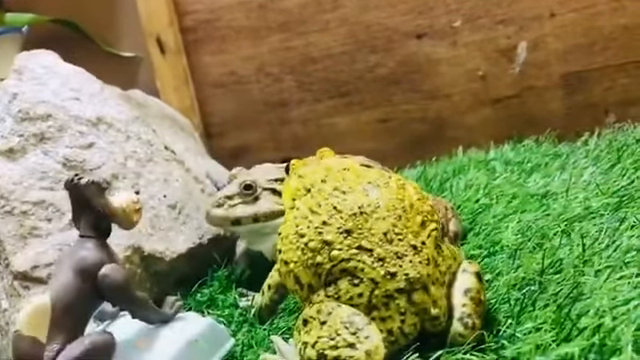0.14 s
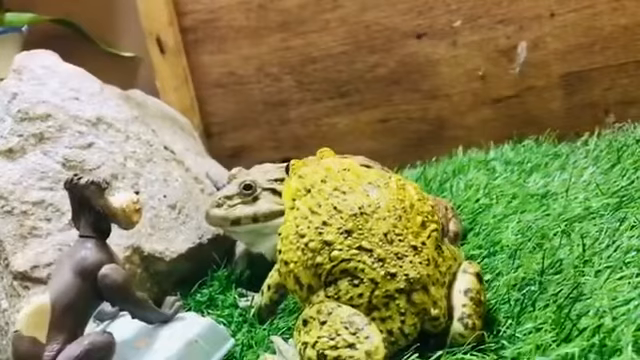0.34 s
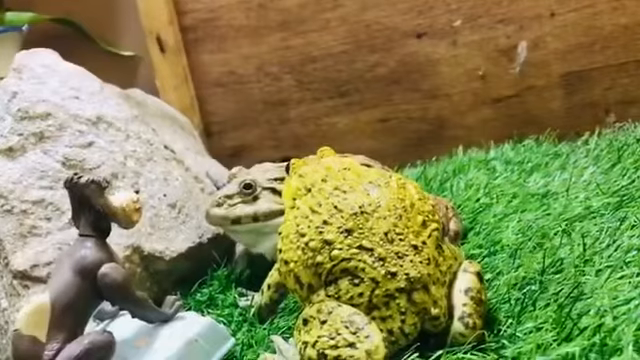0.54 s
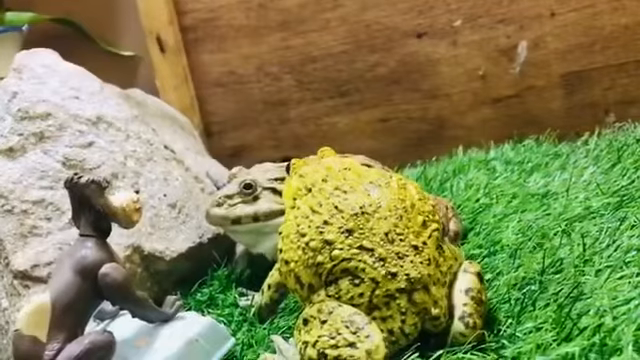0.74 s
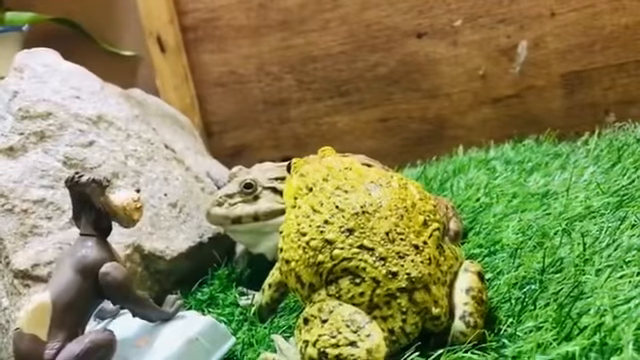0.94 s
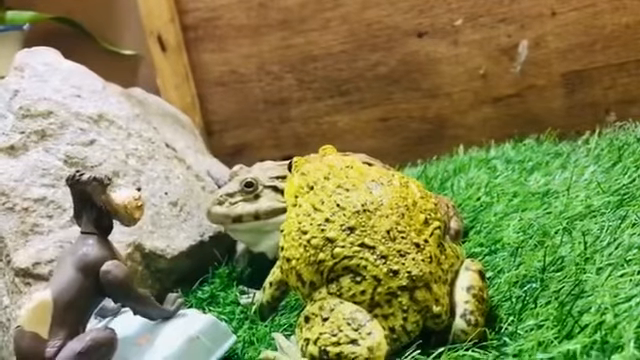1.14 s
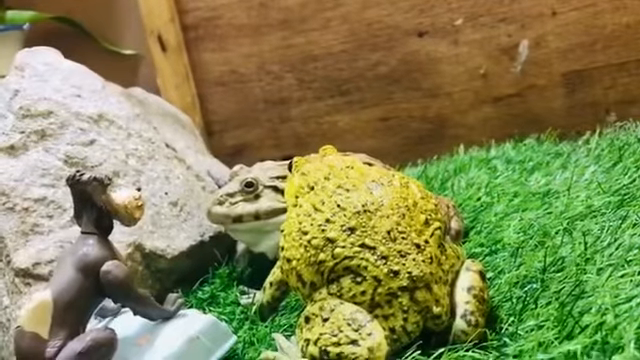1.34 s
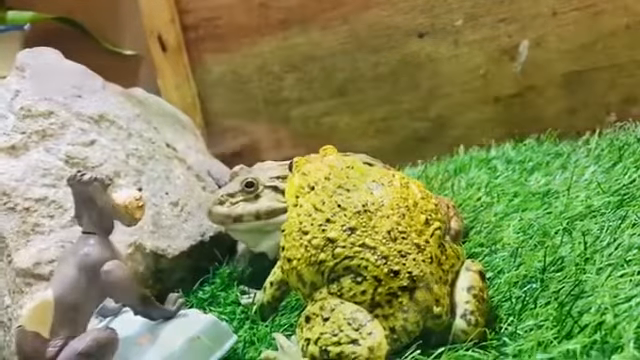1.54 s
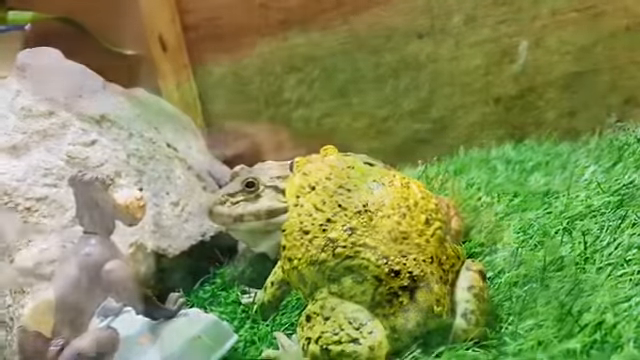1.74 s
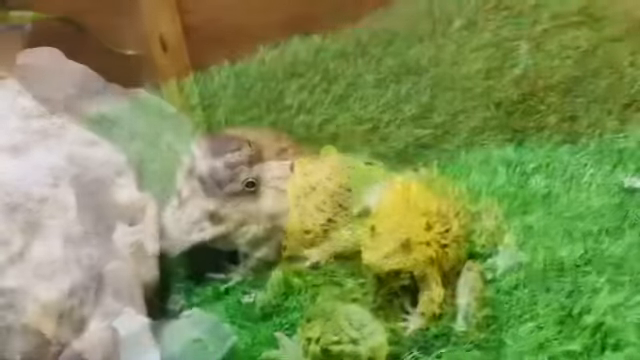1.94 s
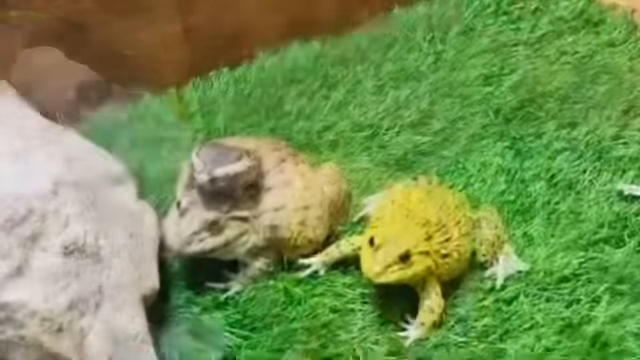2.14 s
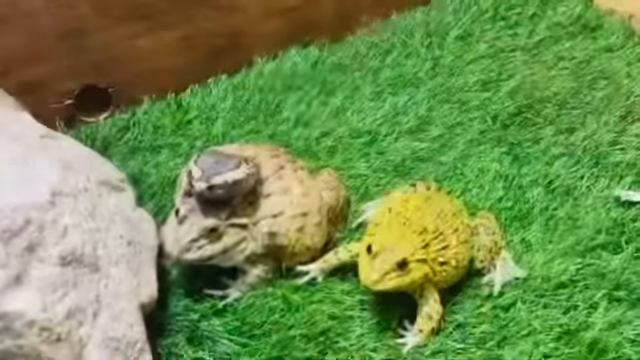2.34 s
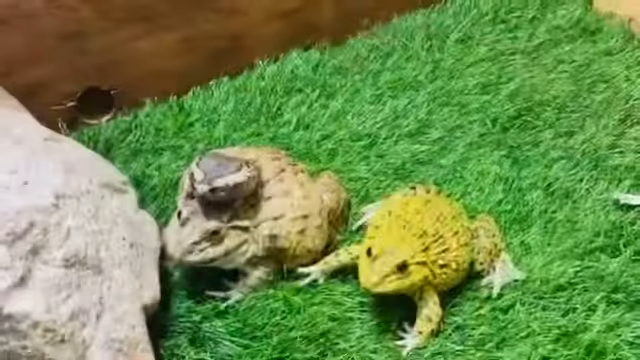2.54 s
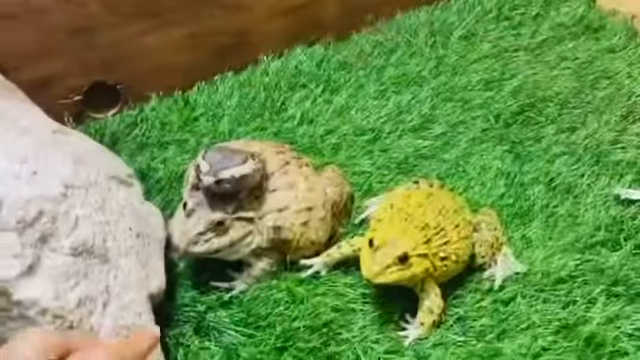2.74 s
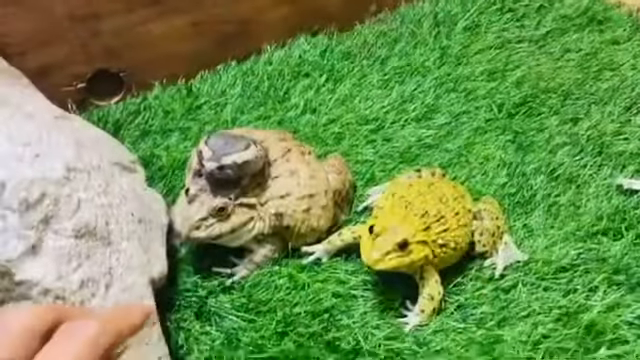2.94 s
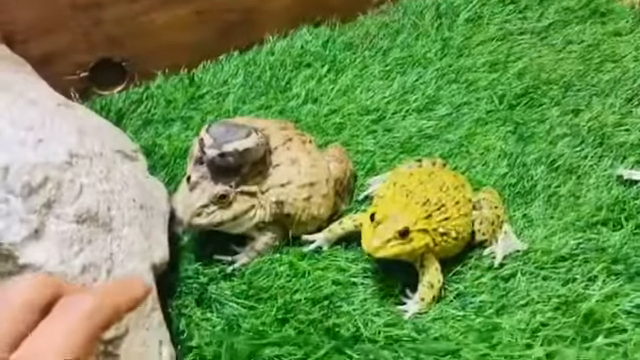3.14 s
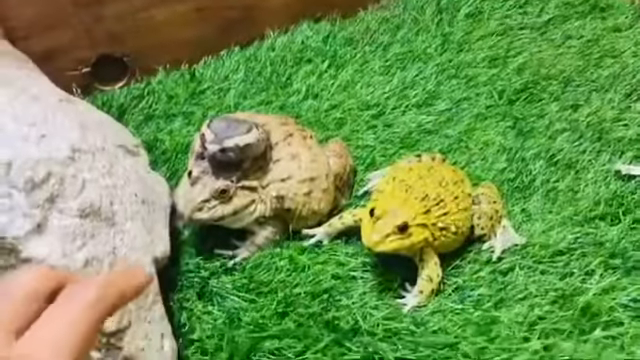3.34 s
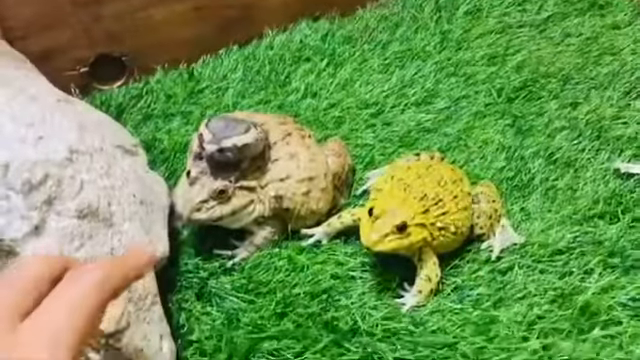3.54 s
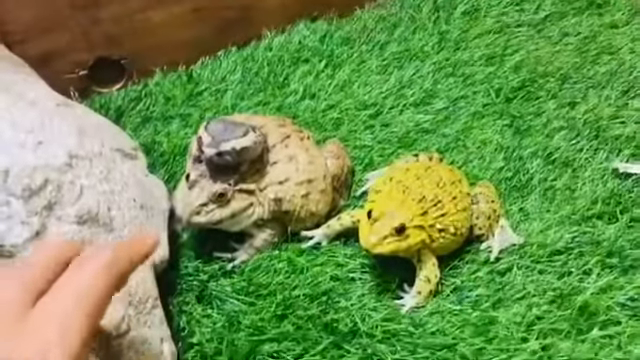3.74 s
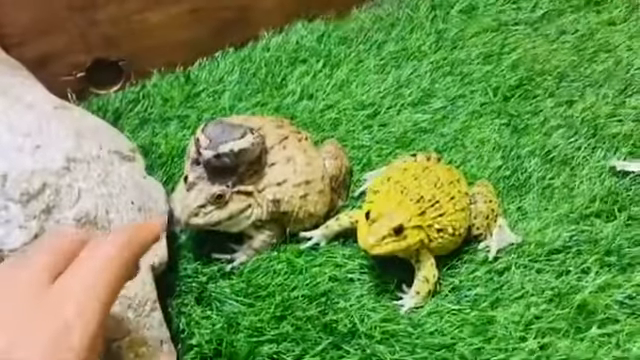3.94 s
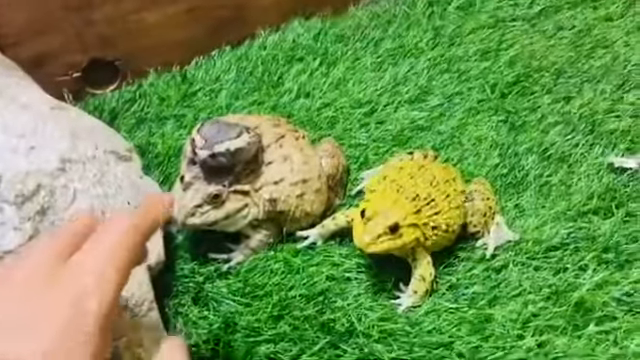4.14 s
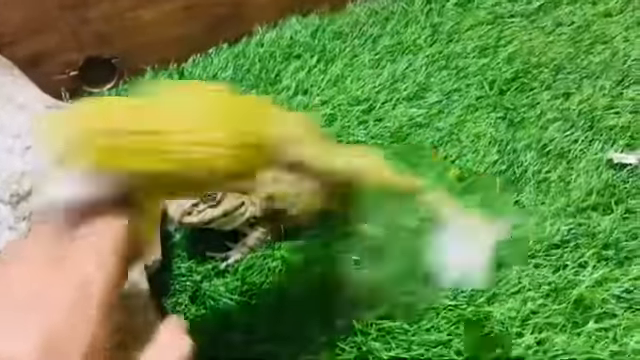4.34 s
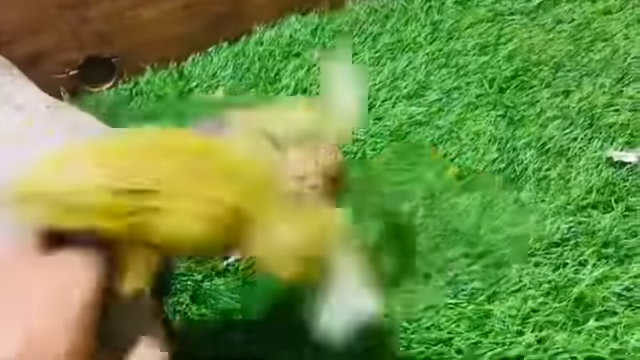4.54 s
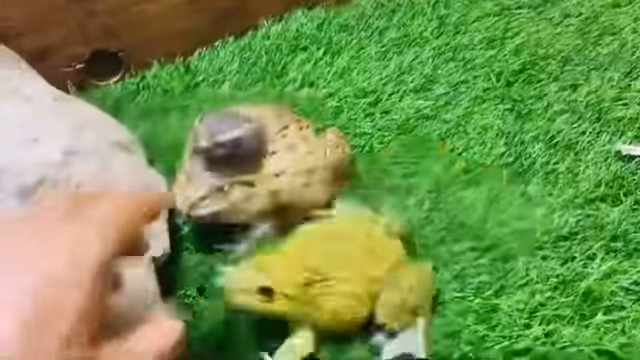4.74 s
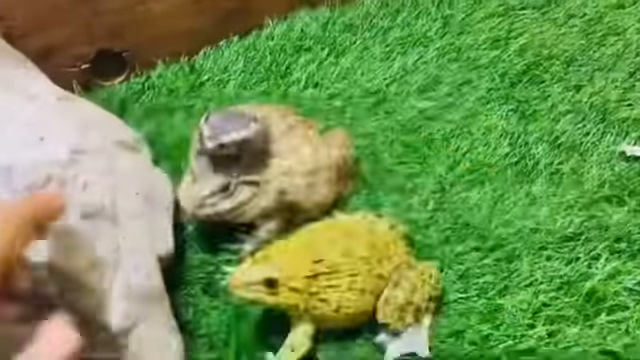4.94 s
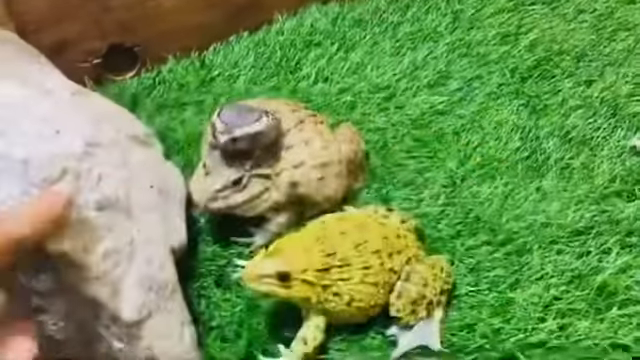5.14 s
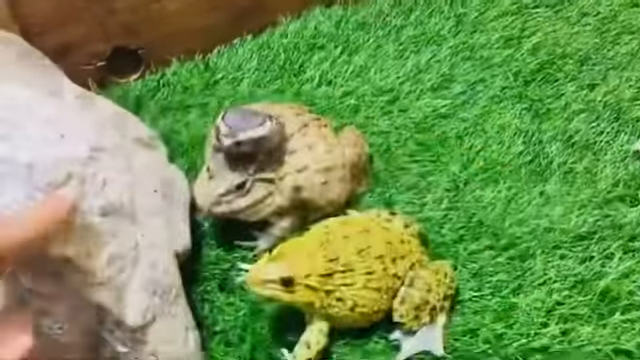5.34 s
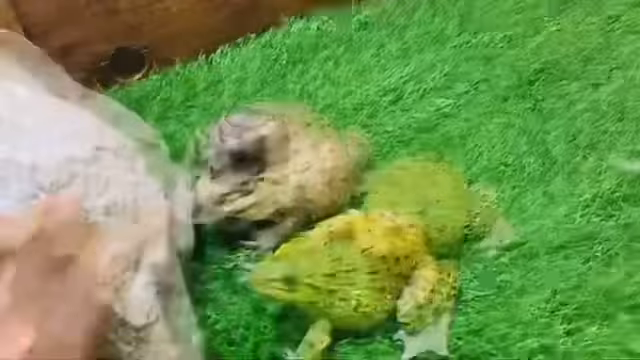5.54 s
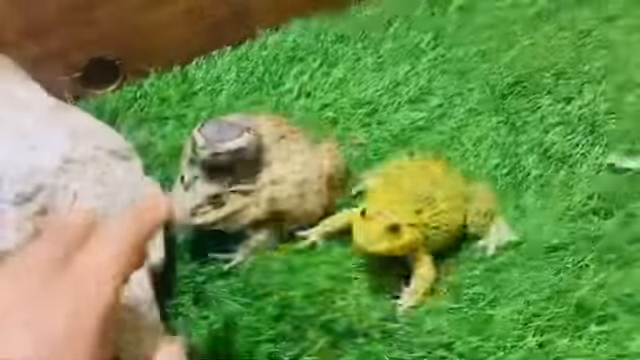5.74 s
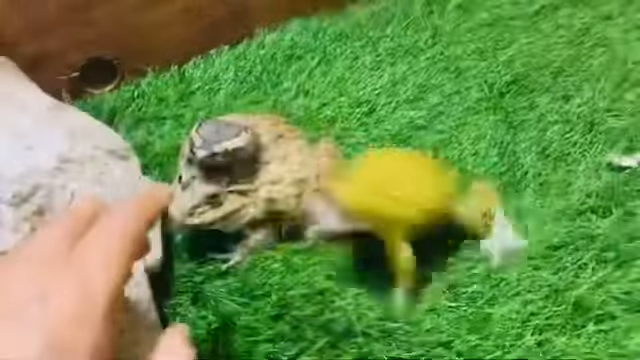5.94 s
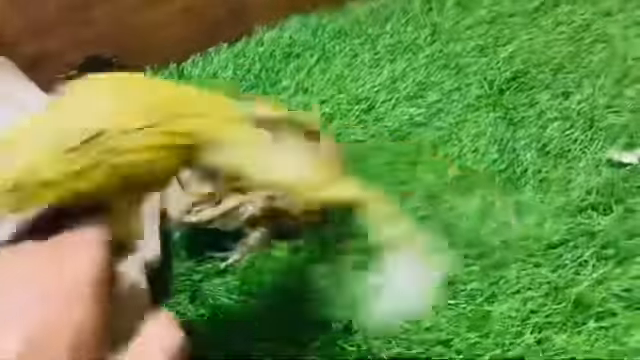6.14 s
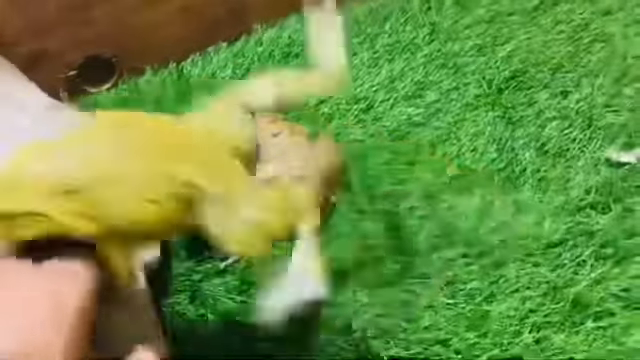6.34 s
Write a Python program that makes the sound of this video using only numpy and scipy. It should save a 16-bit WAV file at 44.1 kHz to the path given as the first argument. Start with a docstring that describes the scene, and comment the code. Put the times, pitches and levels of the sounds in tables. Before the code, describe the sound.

For the first second and a half there is only a very faint, slowed-down background: a deep hum with thin insect tones. By about 2.3 seconds it blends into a normal-speed low motor hum, a high insect chorus and occasional distant trills, all quiet, with a few tiny rustles. A soft hiss swells from 1.8 seconds and stops with a small dull click at 3.5, followed by a light high tick. At about 4.2 seconds a nearby frog, prodded by a hand, gives a loud, shrill, raspy squeal lasting just over a tenth of a second. Its pitch shoots up and then collapses. The cry bounces off the wooden enclosure and rings in the room for under a second. The faint background carries on until about 5.9 seconds, when the same loud squeal repeats, slower and lower, its echo trailing away at the end.

```python
"""First comes a slowed-down background: a deep motor hum, insects and far trills at one third speed.
It fades into true speed, with faint ticks and rustles, while a soft hiss swells and stops with a click.
A bullfrog, prodded by a hand in a wooden enclosure, leaps with a short, shrill squeal from its strained
vocal cords. The cry bounces off the boards and rings in the room. Last, the sound fades into a replay
of the leap at two thirds speed, slower and lower."""
import sys
import numpy as np
from scipy import signal
from scipy.fft import rfft, irfft
from scipy.io import wavfile
from scipy.ndimage import uniform_filter1d, minimum_filter1d, map_coordinates

SR = 44100
rng = np.random.default_rng(int(sys.argv[2]) if len(sys.argv) > 2 else 0)


def store_wav(level_fs):
    """Save 16-bit WAV to argv[1]."""
    pcm = np.round(np.clip(np.atleast_2d(level_fs), -1, 1) * 32767)
    wavfile.write(sys.argv[1], SR, pcm.T.astype(np.int16))


N = 285584
TIME = np.arange(N) / SR
FREQ = np.fft.rfftfreq(N, 1 / SR)
LEAP_S, SOURCE_TOP_HZ = 4.243, 18400


def frog_squeal(jitter=0.019, jitter_hz=600, rasp_db=-8, flutter_hz=90, tear_rad=0.35, tear_hz=500):
    """Vocal cords tighten and slacken; strain shakes their pitch and adds a high rasp to every cycle."""
    # the pitch rises in an arch, then collapses: time_s, pitch_hz
    pitch_curve = [(4.232, 647), (4.234, 671), (4.24, 1006), (4.246, 1341), (4.252, 1510), (4.27, 1678),
                   (4.3, 1509), (4.342, 1371), (4.358, 1231), (4.362, 1114), (4.368, 840), (4.372, 641.4),
                   (4.38, 535.2)]
    # how strongly the throat and open mouth pass each frequency: frequency_hz, level_db
    throat = [(500, -25), (1000, -23.5), (1650, -25.5), (2000, -20.5), (2500, -17), (3100, -13.5),
              (4100, -14.5), (5400, -26), (7300, -16.5), (8700, -22.5), (9850, -14.5), (10400, -30.5),
              (11600, -16), (17000, -34.5)]
    pitch, = in_time(pitch_curve)
    strength, rough, dull_db = frog_mouth()
    pitch = pitch * (1 + jitter * rough * band(0, jitter_hz))
    phase = 2 * np.pi * np.cumsum(pitch) / SR
    on = strength > from_db(-35)
    voice = np.zeros(N)
    for k in range(1, 15):   # harmonics: tones at whole multiples of the pitch
        hz = k * pitch[on]
        # as the frog moves, its echoes shift, so each harmonic flutters on its own, the upper ones most
        flutter_db = min(.8 * k, 3.2) * band(0, flutter_hz)[on]
        gain = gain_at(throat, hz) * (hz < SOURCE_TOP_HZ)
        gain *= from_db(flutter_db - dull_db[on] * np.log2(k))
        tear = min(max(k - 2, 0), 2) * tear_rad * band(0, tear_hz)[on]   # those above the second break up
        voice[on] += gain * np.cos(k * phase[on] + tear + rng.uniform(0, 2 * np.pi))
    rasp = noise(gain_at(throat, FREQ)) * (1 + np.cos(phase)) * np.std(voice[on])
    rasp = signal.sosfilt(signal.butter(6, 3600, "high", fs=SR, output="sos"), rasp)
    return on * strength * (voice + from_db(rasp_db - 3 * dull_db) * rough * rasp)


def frog_mouth(open_s=0.0056, hold_s=.116, shut_s=0.013, settle_s=0.011):
    """The mouth snaps open, holds and shuts, setting how strong, rough and dull the cry is."""
    age = np.maximum(TIME - LEAP_S, 0)
    mouth = ramp(LEAP_S - open_s / 2, open_s) - ramp(LEAP_S + hold_s, shut_s)   # 0 shut, 1 open
    # a soft, dull grunt sounds just before and after the cry, while the mouth is shut
    grunt_db = -6.5 - 900 * np.maximum(age - hold_s, 0)
    cry_db = 1.53 - 12 * age
    onset = ramp(LEAP_S - .014, length_s=.005)
    strength = onset * from_db((1 - mouth) * grunt_db + mouth * cry_db)
    # the cry starts bright and torn, then settles and dulls as the air runs out
    rough = .25 + .4 * mouth * np.exp(-age / settle_s)
    dull_db_per_octave = (1 - mouth) * 10.5 + mouth * (29.5 * age - 1)
    return strength, rough, dull_db_per_octave


def room_echoes(x, box_db=-4, room_db=-14, gap_s=0.00099, build_s=0.014, fade_s=0.63):
    """Add quick echoes from the enclosure's boards, then the long ring of the room around it."""
    # tone of the echoes off the boards: frequency_hz, level_db
    box_tone = [(300, -6.5), (600, 4), (1000, -3.5), (1400, 2.5), (1950, -8), (2600, -1), (3500, -7),
                (5000, 0), (7000, -2), (10400, -0.5), (15000, 0)]
    # tone of the room's ring: frequency_hz, level_db
    room_tone = [(300, 6.5), (600, 3), (1000, 1), (1400, 0.5), (1950, 5), (2600, 0), (3400, -6),
                 (5000, 2.5), (7000, -0.5), (10400, -7), (15000, -9)]
    box_decay_s, room_decay_s = 0.2, 0.91   # time to fall by 60 dB
    age = np.maximum(TIME - gap_s, 0)
    box = rms_one(noise(gain_at(box_tone, FREQ)) * from_db(-60 * age / box_decay_s) * (age > 0))
    ring = from_db(-60 * age / room_decay_s) * (1 - np.exp(-age / build_s))
    ring /= 1 + (age / fade_s) ** 4   # the end of the ring dies away faster still
    room = rms_one(noise(gain_at(room_tone, FREQ)) * ring)
    echoes = (from_db(box_db) * box + from_db(room_db) * room) / np.sqrt(N)
    return x + signal.fftconvolve(x, echoes[:2 * SR])[:N]


def ticks_and_rustles():
    """Small contacts tick or bump and die away; faint high rustles come and go."""
    # small contacts: start_s, centre_hz, width_hz, decay_s (time to fall by 60 dB), level_db
    ticks = [(3.557, 11770, 4300, 0.025, -41.5), (3.569, 11500, 4500, 0.24, -53),
             (4.675, 520, 300, 0.17, -58.5), (4.801, 10100, 2980, 0.054, -58), (5.175, 497, 400, .04, -74)]
    # rustles: start_s, length_s, centre_hz, level_db
    rustles = [(1.36, .12, 11300, -60), (1.56, 0.098, 10300, -62), (1.85, .07, 10100, -67),
               (2.76, 0.18, 12000, -73), (4.035, 0.4, 11660, -66)]
    out = np.zeros(N)
    for start, hz, width, decay_s, db in ticks:
        fall_db = 60 * np.clip((TIME - start) / decay_s, 0, 2)
        out += from_db(db - fall_db) * (TIME >= start) * band(hz, width)
    for start, length, hz, db in rustles:
        out += from_db(db) * swell(start, length) * band(hz, width_hz=2200)
    return out


def hiss_and_click(hiss_db=-63.5, stop_s=3.4668, click_db=-35, click_hz=480, click_decay_s=.008):
    """A soft hiss swells to a steady level, then stops short with a dull click."""
    # tone of the hiss: frequency_hz, level_db
    hiss_tone = [(150, -4), (400, 0), (900, 4.5), (2000, -3), (3500, -6.5), (5500, -20), (9000, -40)]
    strength = from_db(hiss_db) * np.sqrt(ramp(start_s=1.76, length_s=0.54)) * (TIME < stop_s)
    hiss = strength * noise(gain_at(hiss_tone, FREQ) * (FREQ > 100))
    age = np.clip(TIME - stop_s, 0, 2 * click_decay_s)
    click = from_db(click_db - 60 * age / click_decay_s) * np.sin(2 * np.pi * click_hz * age)
    return hiss + click


def far_calls(calls, blur_hz, blur, pulse_depth, pulse_hz=45, fall_hz_per_s=250):
    """Thin pulsing calls that sag in pitch: each is a clean tone, blurred by distance."""
    out = np.zeros(N)
    # a random wobble in both loudness and phase
    wobble = (1 + blur * (band(0, blur_hz) + 1j * band(0, blur_hz))) / np.sqrt(1 + 2 * blur ** 2)
    for start, length, hz, db in calls:
        t = TIME - start - length / 2
        tone = np.real(wobble * np.exp(2j * np.pi * (hz * t - fall_hz_per_s * t ** 2 / 2)))
        pulse = 1 + pulse_depth * np.sin(2 * np.pi * pulse_hz * t)
        out += from_db(db) * np.sqrt(2) * swell(start, length) * tone * pulse
    return out


def insects(level_db, peak_s, throb_hz=7.9):
    """Far insects blend into one shrill, throbbing chorus."""
    # tone of the chorus: frequency_hz, level_db
    chorus_tone = [(6300, -35.5), (7100, -9.5), (7700, -14.5), (8250, -1.5), (8800, -5), (9400, -22.5),
                   (10500, -29.5)]
    throb = 1 + .3 * np.cos(2 * np.pi * throb_hz * (TIME - peak_s))
    return from_db(level_db) * noise(gain_at(chorus_tone, FREQ)) * throb


def motor_hum(gain_db, hold_s=3.3, fade_db_per_s=2.5):
    """A motor's low, wavering tones hold their level, then slowly fade."""
    # the motor's tones: pitch_hz, width_hz, level_db
    tones = [(51, 4, -54), (62, 20, -60), (107.7, 10, -57), (150, 3.5, -77), (247, 150, -70.5),
             (293.7, 75, -72.5)]
    hum = sum(from_db(db) * band(hz, width) for hz, width, db in tones)
    return from_db(gain_db - fade_db_per_s * np.maximum(TIME - hold_s, 0)) * hum


def room_air(level_db):
    """The quiet, steady rush of the room's air."""
    # tone of the air: frequency_hz, level_db
    air_tone = [(40, -7), (100, 1), (200, -8.5), (400, -8), (800, -13.5), (1600, -18), (3000, -18.5),
                (6000, -24.5), (9500, -24.5), (10500, -25), (12000, -24), (15000, -31)]
    return from_db(level_db) * noise(gain_at(air_tone, FREQ) * (FREQ > 40))


def from_db(db):
    """Turn decibels into a number to multiply by."""
    return 10 ** (np.asarray(db) / 20)


def rms_one(x):
    """Scale a sound to an average power of 1."""
    return x / np.sqrt(np.mean(x ** 2) + 1e-20)


def in_time(rows):
    """Join timed points with straight lines, giving a value at every sample."""
    times, *columns = np.transpose(rows)
    return [np.interp(TIME, times, column) for column in columns]


def gain_at(points, hz):
    """Read the gain at any frequency from a tone table."""
    frequencies, db = np.transpose(points)
    return from_db(np.interp(np.log(hz + 1e-9), np.log(frequencies), db))


def noise(shape):
    """Noise of power 1, shaped by a gain for each frequency."""
    return rms_one(irfft(rfft(rng.standard_normal(N)) * shape, N))


def band(hz, width_hz):
    """Noise gathered around one frequency; at 0 Hz, a random wander."""
    return noise(1 / (1 + (2 * (FREQ - hz) / width_hz) ** 2))


def ramp(start_s, length_s):
    """A straight rise from 0 to 1."""
    return np.clip((TIME - start_s) / length_s, 0, 1)


def swell(start_s, length_s):
    """A smooth rise and fall."""
    return np.sin(np.pi * ramp(start_s, length_s))


def low_pass(x, hz):
    """Steeply cut everything above a frequency."""
    return signal.sosfilt(signal.ellip(14, .1, 100, hz, fs=SR, output="sos"), x)


def played_at(x, times):
    """Read a sound at the given times: slowing it lowers its pitch."""
    return map_coordinates(x, [times * SR], order=5, mode="nearest")


def scene(opening_speed=1 / 3, replay_speed=2 / 3, replay_leap_s=5.9195):
    """The slow opening, the leap at true speed and its slow replay, each fading into the next."""
    # far trills in the true-speed part: start_s, length_s, pitch_hz, level_db
    trills = [(1.68, 0.22, 3200, -69), (2.38, 0.266, 3260, -69), (3.07, 0.2, 3231, -69),
              (3.76, 0.228, 3256, -69), (3.92, .2, 3112, -73.5), (5.15, 0.31, 3220, -68)]
    # faint, thin whistles: start_s, length_s, pitch_hz, level_db
    whistles = [(1.88, 0.34, 5500, -82), (3.06, 0.19, 5490, -80), (3.42, .14, 5550, -78.5)]
    # far trills of the opening, before it is slowed: start_s, length_s, pitch_hz, level_db
    opening_trills = [(-.06, 0.15, 2990, -67), (.115, .24, 3205, -64), (.545, .08, 3020, -66)]
    # the fades into true speed and into the replay: start_s, length_s
    fades = [(1.33, 0.97), (5.298, 0.517)]
    background = motor_hum(gain_db=0.2649) + room_air(level_db=-64) + insects(level_db=-65.5, peak_s=3.41)
    background += far_calls(trills, blur_hz=230, blur=1.1, pulse_depth=.3)
    background += far_calls(whistles, blur_hz=40, blur=0.42, pulse_depth=0.078)
    live = low_pass(room_echoes(frog_squeal()) + background + ticks_and_rustles(), SOURCE_TOP_HZ)
    calm = motor_hum(gain_db=-1.2) + room_air(level_db=-65.5) + insects(level_db=-63, peak_s=0.399)
    calm += far_calls(opening_trills, blur_hz=165, blur=0.66, pulse_depth=0.08)
    opening = played_at(low_pass(calm, SOURCE_TOP_HZ), TIME * opening_speed)
    replay = played_at(live, LEAP_S + (TIME - replay_leap_s) * replay_speed)
    to_live, to_replay = (ramp(start, length) for start, length in fades)
    mix = from_db(-.7) * (1 - to_live) * opening
    mix += from_db(-.7) * (to_live - to_replay) * live
    mix += from_db(-.4) * to_replay * replay
    return (mix + hiss_and_click())[None]


def record(dry, ceiling=.97, cutoff_hz=15100):
    """A quick limiter turns down the loudest peaks, then the highest treble is cut."""
    allowed = np.minimum(1, ceiling / (np.abs(dry) + 1e-9))
    gain = uniform_filter1d(minimum_filter1d(allowed, size=45), size=45)
    return low_pass(dry * gain, cutoff_hz)


dry = scene()
out = record(dry)
store_wav(out)
```